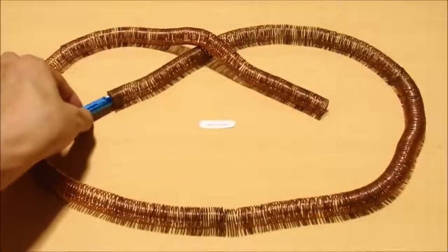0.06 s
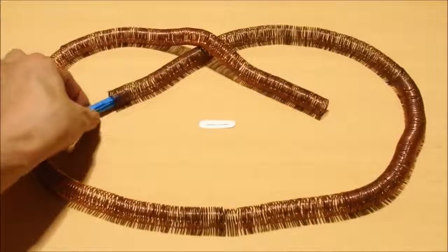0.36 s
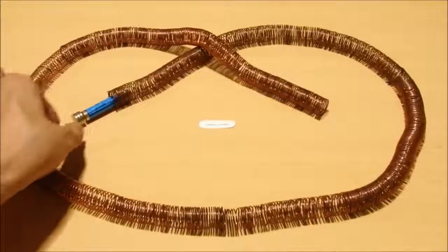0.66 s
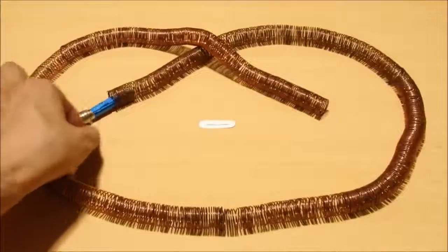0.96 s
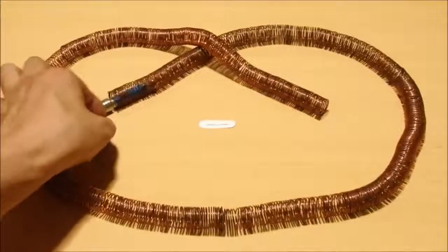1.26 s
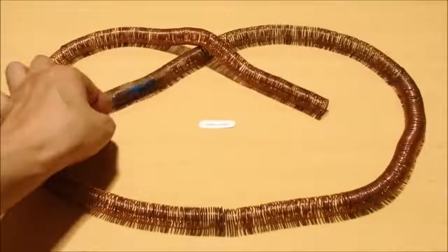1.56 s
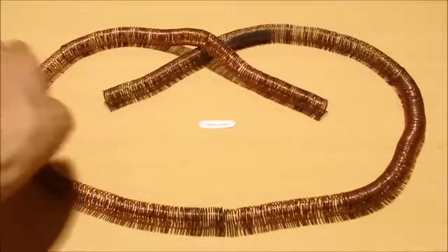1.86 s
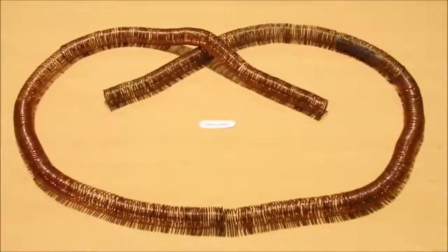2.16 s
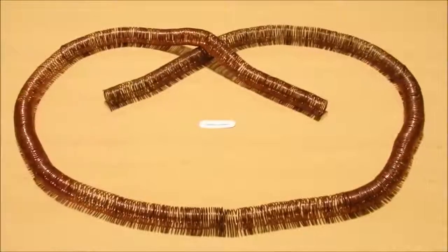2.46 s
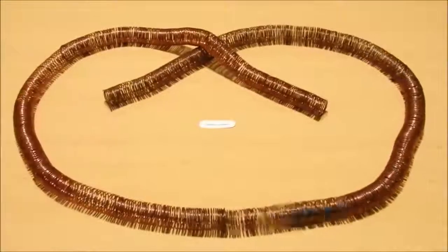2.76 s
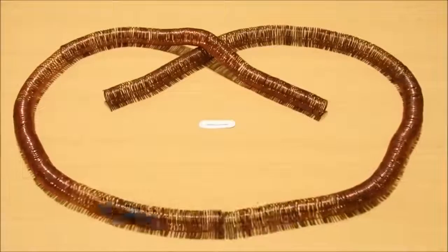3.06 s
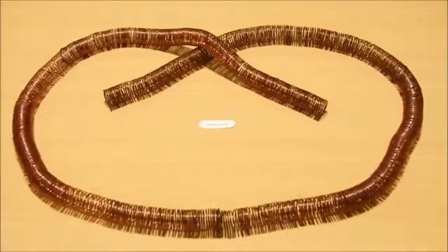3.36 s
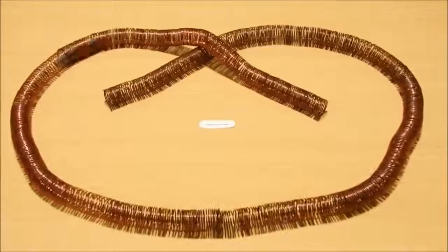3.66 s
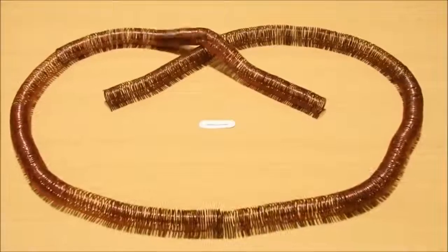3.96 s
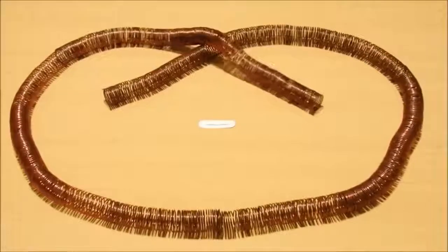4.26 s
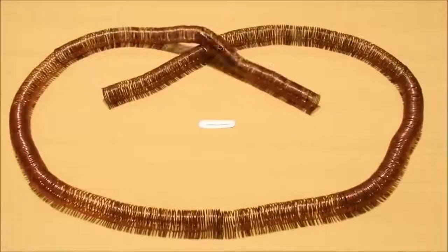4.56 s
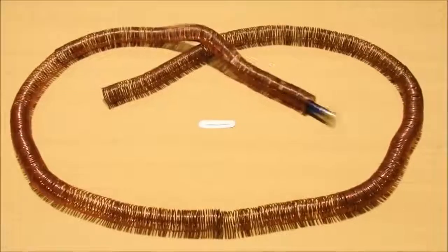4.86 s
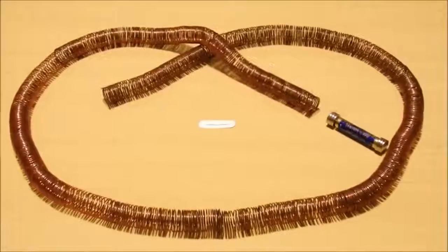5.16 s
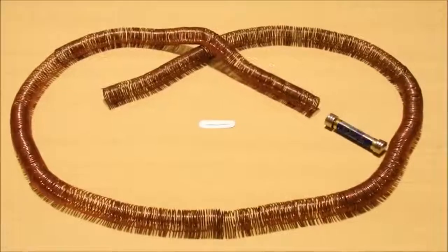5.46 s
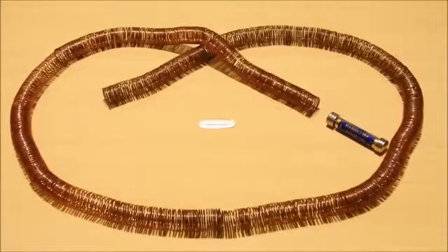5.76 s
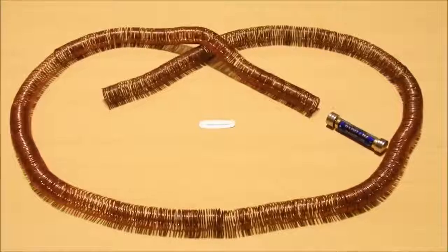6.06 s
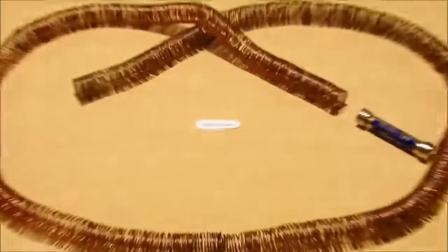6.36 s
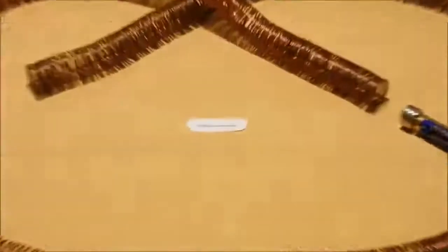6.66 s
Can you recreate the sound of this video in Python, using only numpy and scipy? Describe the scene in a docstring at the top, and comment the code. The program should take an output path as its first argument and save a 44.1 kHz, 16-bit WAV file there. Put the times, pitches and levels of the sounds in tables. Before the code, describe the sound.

In a small room, over a faint low hum, a magnet-tipped battery ticks, knocks and rubs at the mouth of a copper coil. A fast, wiry rattle and scrape takes over for about three seconds, dotted with sharp snaps and table thuds. It eases off, picks up again and ends in a few hard clacks as the battery drops out. Finally, close to the microphone, fingers click on a camera and its zoom motor whirs softly.

```python
"""Battery train in a copper coil

A battery with a magnet on each end is pushed into a long copper coil on a table in a small room.
It pulls itself through, rattling over the turns and drumming on the table, slows at the crossing,
shoots out and drops. A low hum fades early on; at the end a camera is handled and its zoom whirs."""
import sys
import numpy as np
from scipy import signal
from scipy.fft import rfft, irfft
from scipy.io import wavfile
from scipy.ndimage import uniform_filter1d

SR = 44100
rng = np.random.default_rng(int(sys.argv[2]) if len(sys.argv) > 2 else 0)


def waveform_to_disk(signal):
    """Save audio, clipped to [-1, 1], as 16-bit WAV at the path in sys.argv[1]."""
    frames = np.transpose(np.atleast_2d(signal))
    scaled = np.clip(frames, -1, 1) * 32767
    samples = np.round(scaled).astype(np.int16)
    wavfile.write(sys.argv[1], SR, samples)


N = 300497
TIME = np.arange(N) / SR
EXIT_S, CRUISE_TURNS_PER_S = 5.07, 350  # when the battery leaves the coil; its cruising speed
LEFT_RIGHT = np.array([[1], [-1]])


def from_db(db):
    """Decibels to gain."""
    return 10 ** (np.asarray(db) / 20)


def rms_one(x):
    """Scale to an rms of 1."""
    return x / np.sqrt(np.mean(x ** 2) + 1e-20)


def unit(x):
    """Scale to an energy of 1."""
    return x / np.sqrt(np.sum(x ** 2) + 1e-20)


def drift(per_s):
    """Smooth random wander with a spread of about 1."""
    return np.interp(TIME * per_s, np.arange(4096), rng.standard_normal(4096))


def fade(s, release_s):
    """Envelope that stays at 1 until time s, then dies away."""
    return np.exp(-np.clip((TIME - s) / release_s, 0, 30))


def swell(s, hold_s, attack_s, release_s):
    """Envelope that rises to 1 at time s, holds and dies away."""
    return np.exp(-np.clip((s - TIME) / attack_s, 0, 5) ** 2) * fade(s + hold_s, release_s)


def near(s, span_s):
    """Bell-shaped weight around the moment the battery passes a spot."""
    return np.exp(-np.minimum(((TIME - s) / span_s) ** 2, 30))


def add(track, s, sound):
    """Mix a sound into a track at time s."""
    at = int(s * SR)
    track[at:at + len(sound)] += sound[:N - at]


def through(x, response):
    """Pass a signal through an impulse response."""
    return signal.oaconvolve(x, response)[:len(x)]


def colour(eq, size=4096):
    """Minimum-phase response of unit energy, shaped by rows of freq_hz, gain_db."""
    hz, db = np.transpose(eq)
    log_hz = np.log(np.maximum(np.arange(size // 2 + 1) * SR / size, 1))
    cepstrum = irfft(np.log(from_db(np.interp(log_hz, np.log(hz), db))))
    cepstrum[size // 2:] = 0
    return unit(irfft(np.exp(2 * rfft(cepstrum))))


def noise(eq):
    """Coloured noise with an rms of about 1."""
    return through(rng.standard_normal(N), colour(eq))


def resonate(x, hz, width_hz):
    """One resonance with a gain of 1 at its peak."""
    r = np.exp(-np.pi * width_hz / SR)
    feedback = [1, -2 * r * np.cos(2 * np.pi * hz / SR), r * r]
    return signal.lfilter(np.array([1, 0, -1]) * (1 - r * r) / 2, feedback, x + 1e-18)


def ringing(x, modes, waver_db):
    """A body's modes: each wavers as the contact shifts, and may be tied to a spot on the path."""
    out = np.zeros(N)
    for hz, width_hz, db, *spot in modes:
        drive = from_db(db + waver_db * drift(4.9)) * (near(*spot) if spot else 1)
        out += resonate(x * drive, hz, width_hz)
    return out


def crack(decay_s, size=2048):
    """A hard contact: one click smeared over a few ms by reflections inside the material."""
    omega = 2 * np.pi * np.arange(size // 2 + 1) / size
    delays = np.exp(-1j * omega * np.round(rng.uniform(.1, .6, (4, 1)) * decay_s * SR))
    allpasses = (delays - .55) / (1 - .55 * delays)
    return irfft(np.prod(allpasses, axis=0)) * np.sqrt(decay_s * SR / 2)


def shifting_reverb(x, t60_s=0.3, size=24576):
    """Diffuse room tail whose echo pattern changes from one stretch of the path to the next."""
    t = TIME[:int(.35 * SR)]
    decay = np.clip((t - .002) / 0.0028, 0, 1) * from_db(-60 * t / t60_s)
    out, window = np.zeros(N), np.sin(np.pi * np.arange(size) / size)
    for at in range(0, N - size // 2, size // 2):
        stretch = x[at:at + size] * window[:N - at]
        echoes = unit(rng.standard_normal(len(t)) * decay)
        add(out, at / SR, signal.fftconvolve(stretch, echoes))
    return out


def in_room(x, wet_db, side_db):
    """Centred direct sound blended with the small room's stereo reverb."""
    reverb = shifting_reverb(x) + from_db(side_db) * shifting_reverb(x) * LEFT_RIGHT
    wet = from_db(wet_db)
    return (x + wet * reverb) / np.sqrt(1 + wet ** 2)


# Tone of the room's hiss: freq_hz, gain_db
HISS_EQ = [(50, 14), (300, 0.5), (450, -1), (720, 1.5), (950, -8.5), (1250, 1.5), (1550, -3), (1900, -9),
           (2700, -8), (3500, -1.5), (7000, -4.5), (11000, -10.5), (16000, -18)]

def room_tone():
    """Faint, wide hiss over a deep room murmur."""
    hiss = noise(HISS_EQ) + from_db(-0.5) * noise(HISS_EQ) * LEFT_RIGHT
    murmur = noise([(12, -7), (30, 13), (50, -7), (100, -33), (300, -26.5)])
    return from_db(-56.5) * hiss + from_db(-58.5) * murmur


# Fader ride of the rumble: time_s, level_db
RUMBLE_RIDE = [(0, -50.5), (1.5, -52), (2.95, -47), (3.08, -35), (3.3, -48.5), (5.2, -44), (5.5, -52.5),
               (6.1, -50.5), (6.6, -60.5), (6.81, -51)]
# Tone of the rumble: freq_hz, gain_db
RUMBLE_EQ = [(20, -38), (45, -2), (75, 0), (110, -7.5), (170, -13), (300, -21.5), (450, -27.5), (720, -21),
             (1000, -32), (2500, -57)]

def rumble():
    """An uneven low bed that swells briefly midway."""
    return from_db(np.interp(TIME, *np.transpose(RUMBLE_RIDE), right=-150)) * noise(RUMBLE_EQ)


# Harmonics of the hum: pitch_hz, gain_db
HUM_PARTIALS = [(53.3, -3), (106.6, -15), (159.9, -17.5)]

def hum():
    """A low hum that wavers slightly in pitch and level, then fades."""
    clock_s = np.cumsum(1 + 0.0069 * drift(3.2)) / SR
    tone = sum(from_db(db + 0.5 * drift(2.8)) * np.sqrt(2) * np.sin(2 * np.pi * hz * clock_s)
               for hz, db in HUM_PARTIALS)
    return from_db(-42) * fade(2.52, release_s=0.12) * tone


# Finger clicks on the camera: start_s, body_db, body_pitch_hz, tick_db
FINGER_CLICKS = [(5.87, -39, 1050, -39), (6.0895, -27.5, 1350, -27.5), (6.1869, -35, 1860, -28.5),
                 (6.191, -39, 1000, -32), (6.306, -38, 2060, -29), (6.341, -24, 5560, -31)]
# Bright tick of the shell: freq_hz, gain_db
TICK_EQ = [(600, -24), (1200, -2), (2200, 4), (3100, 0), (6000, 8), (9000, 6.5), (15000, -5)]
# Hollow ring of the shell: pitch_hz, width_hz, gain_db
SHELL_RING = [(1150, 130, 4), (1650, 200, 1), (2250, 170, 3)]

def camera_handling():
    """The camera's hollow plastic shell clicks under the fingers."""
    clicks = np.zeros(N)
    for s, body_db, hz, tick_db in FINGER_CLICKS:
        burst = crack(decay_s=0.0011)
        add(clicks, s, from_db(tick_db - 4.5) * through(burst, colour(TICK_EQ)))
        add(clicks, s, from_db(body_db + 3.5) * resonate(burst, hz, width_hz=530))
    return clicks + ringing(clicks, SHELL_RING, waver_db=6.5)


# Bumps of the zoom gears: start_s, level_db
GEAR_BUMPS = [(6.343, -20), (6.351, -18.5)]
# Tone of the motor's whir: freq_hz, gain_db
WHIR_EQ = [(300, -24), (1000, -43), (1400, -20), (2100, -7), (2650, -19), (3350, -2.5), (3850, 2),
           (4400, -13), (5300, -4), (6300, -4), (7500, -2), (8250, -1), (9300, -10), (16000, -32)]

def zoom_motor(start_s=6.343, tooth_hz=260):
    """The gears take up their slack in two bumps; the whir starts with a surge and settles."""
    bumps = np.zeros(N)
    bump = colour([(60, 5), (190, 27), (550, 17), (1200, -10), (5000, -45)])
    for s, db in GEAR_BUMPS:
        add(bumps, s, from_db(db) * bump)
    teeth = 1 + 0.5 * np.sin(2 * np.pi * tooth_hz * TIME)
    whir = np.array([through(rng.standard_normal(N) * teeth, colour(WHIR_EQ)) for ear in range(2)])
    surge_db = 8 * fade(start_s, release_s=0.1)
    return bumps + (TIME > start_s) * from_db(-54 + surge_db) * whir


# Tone of the drumming table: freq_hz, gain_db
DRUM_EQ = [(40, -16.5), (110, -9.5), (165, -3.5), (215, 4), (275, -1), (350, -5.5), (520, -7.5),
           (680, -12.5), (850, -7), (1200, -16), (2500, -44)]
# Ring of the table top: pitch_hz, width_hz, gain_db
TABLE_RING = [(229, 48, -4), (320, 36, -6), (366, 40, -2), (441, 28, -5), (503, 25, -2), (625, 22, -7),
              (800, 22, -3), (995, 27, -2)]
# Table resonances that wake near one spot: pitch_hz, width_hz, gain_db, loudest_s, span_s
SPOT_RING = [(360, 29, 12, 1.96, 0.48), (476, 62, 8.5, 1.88, 0.37)]

def table_drumming(force):
    """Taps on the coil drum on the table top below it."""
    board = from_db(-3) * through(force, colour(DRUM_EQ))
    return board + ringing(board, list(TABLE_RING) + list(SPOT_RING), waver_db=2)


# The battery hits the table: start_s, thud_db, clack_db, clack_centre_hz, bounce_loss_db
TABLE_HITS = [(0.480, -33, -40.5, 2420, 6), (0.6084, -13, -12, 2420, 9), (0.623, -25, -28, 2360, 16),
              (0.977, -38, -67, 2193, -5), (1.3, -21, -37, 1540, 2), (1.408, -20.5, -28, 1770, 6.5),
              (1.953, -18, -20.5, 2020, 10), (2.625, -24.5, -32, 1650, 1), (2.759, -19.5, -21.5, 1960, 17),
              (3.019, -27, -25.5, 1750, 5), (3.061, -19, -23, 1740, 15), (3.249, -20, -21.5, 1750, 10),
              (3.475, -22, -23, 1830, 7), (3.719, -15, -29.5, 1560, -0.5), (3.906, -19.5, -60, 1570, -7),
              (4.117, -22, -30, 1730, 0.5), (4.969, -18.5, -27.5, 1910, 1), (5.064, -16.5, -10, 3800, 13),
              (5.194, -14.5, -10.5, 3100, 2), (5.2236, -20, -20, 2970, 6)]
# Thud of the table top: freq_hz, gain_db
THUD_EQ = [(40, -26), (110, -1.5), (165, -6), (220, 3), (300, 1.5), (390, 0), (510, -4), (680, -1),
           (820, -7), (1000, -7.5), (1250, -20), (2500, -30)]
# Clack of the casing when centred on 3100 Hz: freq_hz, gain_db
CLACK_EQ = [(250, -32), (550, -9.5), (900, -5.5), (1450, -8), (1900, -5), (2350, -0.5), (3000, -0.5),
            (3500, 0), (4200, -2.5), (4700, -7.5), (6000, -14), (9000, -18.5), (12500, -45), (20000, -66)]
# Ring of the casing: pitch_hz, width_hz, gain_db
CASING_RING = [(1800, 170, -6), (2620, 240, -5), (2950, 180, -11), (3430, 170, -5), (4200, 220, -8)]

def knocks(bounce_gap_s=0.0115, extra_thud_loss_db=11):
    """The table thuds and the metal casing clacks; three quick bounces follow, more clack than thud."""
    impacts, clacks = np.zeros(N), np.zeros(N)
    for s, thud_db, clack_db, hz, loss_db in TABLE_HITS:
        casing = colour(np.array(CLACK_EQ) * [hz / 3100, 1])
        for bounce in range(4):
            jitter = min(bounce, 1) * rng.uniform(-0.25, 0.25)
            at_s = s + bounce_gap_s * (bounce + jitter)
            add(impacts, at_s, from_db([thud_db + 17 - bounce * (loss_db + extra_thud_loss_db)]))
            clack = through(crack(decay_s=0.0018), casing)
            add(clacks, at_s, from_db(clack_db + 2.5 - bounce * loss_db) * clack)
    board = through(impacts, colour(THUD_EQ))
    thuds = board + from_db(-2.5) * ringing(board, TABLE_RING, waver_db=2.5)
    return thuds, clacks + ringing(clacks, CASING_RING, waver_db=2.5)


# Thin tones at the coil's mouth: peak_s, hold_s, pitch_hz, level_db
SUNG_NOTES = [(0.18, 0.043, 2320, -51), (0.474, 0.05, 6370, -61), (1.165, 0.13, 6350, -56),
              (1.215, 0.11, 2320, -47.5), (1.412, 0.025, 2300, -41), (1.49, 0.17, 2300, -64)]

def singing_turn():
    """A magnet sticks and slips along one turn and keeps it ringing unsteadily."""
    out = np.zeros(N)
    for s, hold_s, hz, db in SUNG_NOTES:
        level = from_db(db + 3 * drift(44.3)) * swell(s, hold_s, attack_s=0.015, release_s=0.025)
        clock_s = np.cumsum(1 + 0.004 * drift(100)) / SR
        out += level * np.sin(2 * np.pi * hz * clock_s)
    return out


# Pace of the battery once it is let go: time_s, turns_per_s
SPEED_CURVE = [(1.745, 190), (1.8, 310), (1.9, 377), (2.0, 380), (2.24, 377), (2.47, 310), (2.6, 256),
               (2.75, 310), (3.0, 310), (3.18, 318), (3.35, 390), (3.65, 448), (3.84, 360), (3.97, 223),
               (4.19, 258), (4.26, 103), (4.43, 82), (4.63, 94), (4.72, 176), (4.8, 170), (4.88, 296),
               (5.0, 315), (5.18, 590)]

def speed():
    """Turns passed per second; next to none before and after the run."""
    return np.interp(TIME, *np.transpose(SPEED_CURVE), left=.01, right=.01)


def stray_snaps(cruise_per_s=5, cruise_db=-17):
    """Light chance snaps, denser and louder with speed: rows of start_s, level_db, pitch_hz."""
    pace = speed() / CRUISE_TURNS_PER_S
    hits = np.flatnonzero((rng.random(N) < cruise_per_s * pace / SR) & (TIME < EXIT_S))
    return [(i / SR, cruise_db + 20 * np.log10(pace[i]) + rng.uniform(-2, 2), rng.uniform(5200, 8200))
            for i in hits]


# Accents of magnet on wire: start_s, level_db, pitch_hz
SNAP_HITS = [(0.1323, -26, 6960), (0.1777, -28.5, 7130), (0.1947, -26.5, 6600), (0.4801, -41, 6400),
             (0.518, -44, 6350), (1.2142, -28, 6350), (1.2556, -29, 6450), (1.275, -34, 7130),
             (1.4053, -29, 6560), (1.7465, -26, 5960), (1.7558, -9.5, 8600), (1.910, -31, 6800),
             (1.9779, -6.5, 8000), (2.066, -6, 7130), (2.0796, -4, 7750), (2.1685, -6.5, 8800),
             (2.1978, -19, 6500), (2.2188, -10.5, 8400), (2.3335, -9.5, 7350), (2.3774, -7, 8500),
             (2.4622, -12, 5520), (2.6558, -10.5, 5630), (2.792, -17, 6590), (2.8119, -10.5, 6550),
             (2.9223, -12, 6440), (3.0604, -10.5, 6260), (3.1661, -25, 6130), (3.4296, -7, 6280),
             (3.594, -9.5, 7460), (3.664, -8, 6860), (4.0263, -6.5, 8300), (4.062, -12.5, 8050),
             (4.079, -12.5, 8500), (4.1434, -13, 6700), (4.2762, -18, 5800), (4.3263, -25, 7000),
             (4.4678, -24, 5800), (4.5338, -23, 5850), (4.6131, -25, 7560), (4.7459, -9, 6430),
             (4.9519, -9, 5940), (5.064, -17, 5430)]
# Tone of their crack: freq_hz, gain_db
SNAP_EQ = [(1500, -29), (3500, -4.5), (5400, -0.5), (7400, 2.5), (8800, -3.5), (10500, -8.5), (12500, -14),
           (16000, -23)]

def magnet_snaps():
    """A magnet snaps hard against the wire: a crack and the ping of one turn."""
    force, rings = np.zeros(N), np.zeros(N)
    for s, db, hz in list(SNAP_HITS) + stray_snaps():
        burst = from_db(db) * crack(decay_s=0.0022)
        add(force, s, from_db(-5) * burst)
        add(rings, s, from_db(6) * resonate(burst, hz, width_hz=360))
    return through(force, colour(SNAP_EQ)) + rings


def taps(per_s, spread_db):
    """Randomly timed impulses of uneven size."""
    sizes = from_db(spread_db * np.clip(rng.standard_normal(N), -2, 2))
    return sizes * (rng.random(N) < per_s / SR)


def contacts(per_s, spread_db, friction_db, clump_db):
    """Force of taps on the turns over fine sliding friction; its running rms is held at 1."""
    tapping = rms_one(taps(per_s, spread_db) * rng.choice([-1, 1], N) / np.sqrt(per_s))
    friction = from_db(friction_db) * rng.standard_normal(N)
    force = (tapping + friction) * from_db(clump_db * drift(170))
    return force / np.sqrt(uniform_filter1d(force ** 2, size=2600) + 1e-9)


def plucked_turns(per_s):
    """Each plucked turn pings for a few ms at a pitch of its own."""
    plucks = taps(per_s, spread_db=3)
    pitches_hz = np.geomspace(4800, 9300, 20)
    turn = rng.integers(0, len(pitches_hz), N)
    rings = sum(resonate(plucks * (turn == k), hz, width_hz=280) for k, hz in enumerate(pitches_hz))
    return rms_one(rings / np.sqrt(per_s))


def brushed_turns(metal, count=70, length_s=0.09, low_hz=2800, high_hz=8000):
    """Single turns pick up the scrape for a moment each, so the wiry ringing keeps shifting."""
    out, size = np.zeros(N), int(length_s * SR)
    for when, pitch in rng.random((count, 2)):
        s = np.interp(when, [0, 1], [SPEED_CURVE[0][0], EXIT_S - length_s])
        grain = metal[int(s * SR):int(s * SR) + size] * np.hanning(size)
        add(out, s, resonate(grain, low_hz * (high_hz / low_hz) ** pitch, width_hz=90))
    return from_db(1) * out


# Midrange scrape of the wire: freq_hz, gain_db
SCRAPE_EQ = [(500, -17), (850, -18.5), (1200, -8), (1600, -4.5), (1900, 2), (2600, 2.5), (3200, 1.5),
             (3600, 3.5), (4800, -2), (6500, -1.5), (10000, -34)]
# Bright rattle on top: freq_hz, gain_db
RATTLE_EQ = [(2000, -12.5), (4000, 0.5), (5400, -3), (7400, 0.5), (9200, -7), (10500, -6), (12000, -13.5),
             (14000, -10.5), (16000, -24)]

def sliding(drum, scrape, rattle, turns_per_s, modes):
    """Both magnets tap the turns they pass; three gain envelopes play the wire and the table."""
    taps_per_s = 2 * np.maximum(turns_per_s, 10)
    force = contacts(taps_per_s, spread_db=4.5, friction_db=-2, clump_db=0)
    # every turn sits differently, so part of the rattle has contacts of its own
    own_force = contacts(taps_per_s, spread_db=5, friction_db=-1.5, clump_db=3.5)
    chatter = (force + 1.2 * own_force) / np.hypot(1, 1.2)
    metal = from_db(-2) * through(force * scrape, colour(SCRAPE_EQ))
    metal += from_db(-3) * through(chatter * rattle, colour(RATTLE_EQ))
    metal += from_db(-4) * rattle * plucked_turns(taps_per_s)
    wire = metal + ringing(metal, modes, waver_db=1.2) + brushed_turns(metal)
    return wire, table_drumming(force * drum)


# Pushes of the hand: peak_s, hold_s, drum_db, scrape_db, rattle_db
HAND_PUSHES = [(0.133, 0.0044, -50.5, -43, -50), (0.193, 0.021, -52.5, -45, -68),
               (0.495, 0.17, -52, -55.5, -73), (1.206, 0.093, -41.5, -43.5, -47.5),
               (1.39, 0.018, -38, -42, -61), (1.503, 0.14, -54.5, -59.5, -80),
               (1.711, 0.069, -47, -48.5, -47.5)]
# Ring of the coil's open end: pitch_hz, width_hz, gain_db
MOUTH_RING = [(1870, 45, -5), (2298, 28, 4), (4090, 70, -5), (6400, 140, 0), (7010, 130, 0)]

def battery_push():
    """The hand feeds the battery in, rubbing it slowly over the coil's mouth."""
    drum, scrape, rattle = sum(
        from_db(levels_db)[:, None] * swell(s, hold_s, attack_s=0.69 * hold_s, release_s=0.037)
        for s, hold_s, *levels_db in HAND_PUSHES)
    return sliding(drum, scrape, rattle, turns_per_s=130, modes=MOUTH_RING)


# Tight stretches where the battery presses harder on the wire: peak_s, hold_s, boost_db
TIGHT_SPOTS = [(1.956, 0.063, 2), (2.304, 0.21, 1), (2.736, 0.1, 2), (3.006, 0.088, 2.5), (3.255, 0.022, 0),
               (3.37, 0.1, 0), (4.004, 0.17, 3.5)]
# Turns that ring as the battery passes: pitch_hz, width_hz, gain_db, loudest_s, span_s
COIL_RING = [(1900, 70, -4, 4.8, 0.5), (2302, 35, 3, 1.85, 0.2), (2302, 40, 3, 2.3, 0.2),
             (2200, 120, -2, 3.48, 0.12), (2310, 45, 1, 5.12, 0.15), (2530, 60, -7, 3.9, 0.7),
             (2885, 80, -3, 2.7, 0.8), (2970, 60, -4, 3.5, 0.5), (3500, 100, 0, 2.0, 0.17),
             (3530, 110, -1, 2.36, 0.15), (3412, 60, -1, 3.07, 0.17), (3440, 90, -3, 4.15, 0.45),
             (3780, 120, -1, 4.76, 0.15), (4170, 100, -2, 2.45, 0.12), (4200, 70, -6, 3.3, 0.5),
             (3460, 110, -7, 3.5, 0.4), (4450, 80, -2, 1.82, 0.12), (4560, 100, -2, 2.7, 0.14),
             (5320, 130, -1, 2.48, 0.16), (5150, 110, -1, 3.07, 0.17), (5550, 110, -3, 3.22, 0.12),
             (5780, 140, -2, 3.84, 0.12), (5800, 200, 0, 4.47, 0.15), (5760, 220, -2, 4.9, 0.2),
             (6450, 250, -7, 3.6, 0.6), (7200, 200, -3, 1.8, 0.16), (7130, 200, -2, 2.6, 0.17),
             (7590, 110, -1, 2.42, 0.2), (7500, 120, -4, 4.6, 0.4), (8100, 150, -2, 4.1, 0.17),
             (8100, 90, 0, 4.8, 0.3), (9240, 140, -2, 2.1, 0.2)]

def battery_run():
    """The battery pulls itself through the coil, louder with speed and in the tight stretches."""
    doublings = np.log2(speed() / CRUISE_TURNS_PER_S)
    squeeze_db = sum(db * swell(s, hold_s, attack_s=0.027, release_s=0.0056)
                     for s, hold_s, db in TIGHT_SPOTS)
    drum = from_db(-34.5 + 6.9 * doublings + squeeze_db)
    scrape = from_db(-32.5 + 5.8 * doublings + squeeze_db)
    rattle = from_db(-26 + 8.4 * doublings + squeeze_db)
    drum *= from_db(drift(22))  # the coil lifts off the table and settles
    scrape *= from_db(1.2 * drift(16))  # the turns lie tighter or looser
    # out of the coil the rattle cuts off, while the scrape carries on through a short skid
    scrape *= fade(EXIT_S, release_s=0.94)
    rattle *= fade(EXIT_S, release_s=0.0034)
    return sliding(drum, scrape, rattle, speed(), COIL_RING)


def scene():
    """Coil and table in the room, the camera dry and close; the bass leans to the left."""
    push_wire, push_drumming = battery_push()
    run_wire, run_drumming = battery_run()
    thuds, clacks = knocks()
    coil = (in_room(push_wire, wet_db=6, side_db=-6.5)
            + in_room(run_wire, wet_db=-1.5, side_db=-8)
            + in_room(magnet_snaps(), wet_db=-0.5, side_db=-7)
            + in_room(singing_turn(), wet_db=-6, side_db=-8))
    table = (in_room(push_drumming + run_drumming, wet_db=-3, side_db=-35)
             + in_room(thuds, wet_db=1, side_db=-21)
             + in_room(clacks, wet_db=4, side_db=-10))
    lean_left = from_db(1.14 * LEFT_RIGHT)
    return coil + lean_left * (table + hum() + rumble()) + camera_handling() + zoom_motor() + room_tone()


# Stereo width by frequency: freq_hz, side_gain_db
SIDE_EQ = [(100, -0.5), (600, -2), (1200, -23), (2000, -23.5), (3500, -0.5), (12000, 3)]

def record(dry, cutoff_hz=15700):
    """The sound narrows to nearly mono between 1 and 2 kHz; the top is cut steeply."""
    mid, side = (dry[0] + dry[1]) / 2, (dry[0] - dry[1]) / 2
    side_db = np.interp(np.arange(N // 2 + 1) * SR / N, *np.transpose(SIDE_EQ))
    side = irfft(rfft(side) * from_db(side_db), N)
    high_cut = signal.ellip(10, .1, 80, cutoff_hz, fs=SR, output="sos")
    return signal.sosfilt(high_cut, mid + side * LEFT_RIGHT)


dry = scene()
out = record(dry)
waveform_to_disk(out)
```